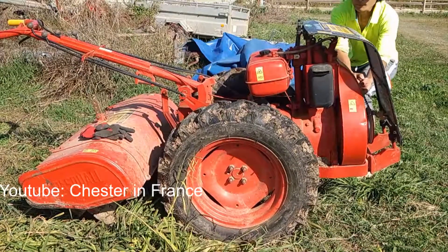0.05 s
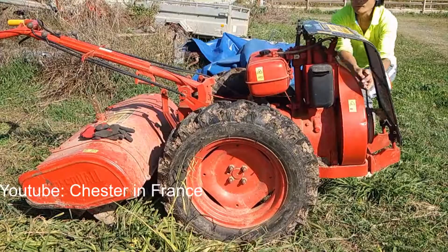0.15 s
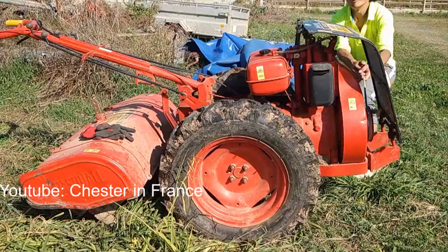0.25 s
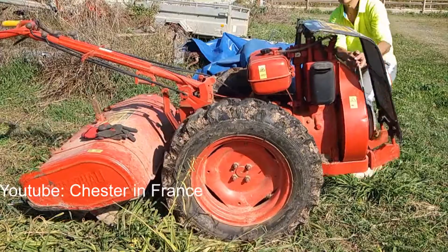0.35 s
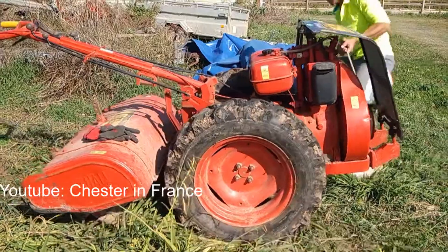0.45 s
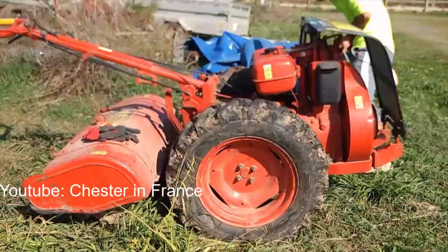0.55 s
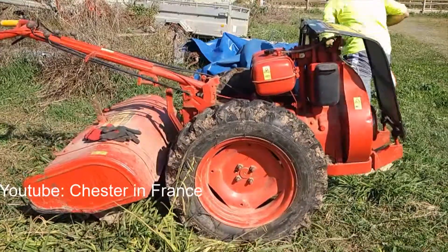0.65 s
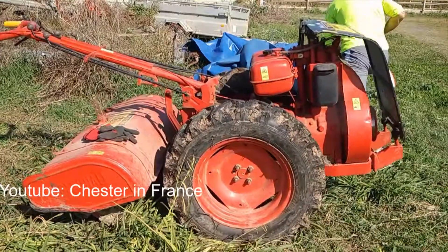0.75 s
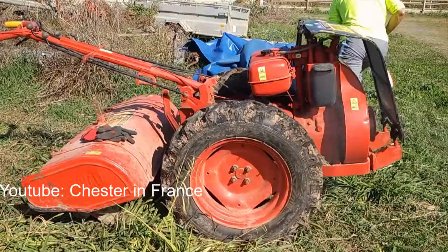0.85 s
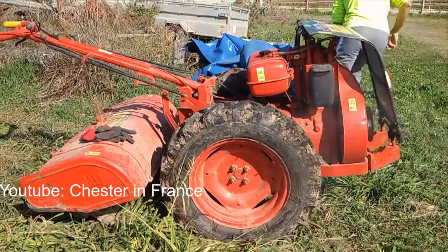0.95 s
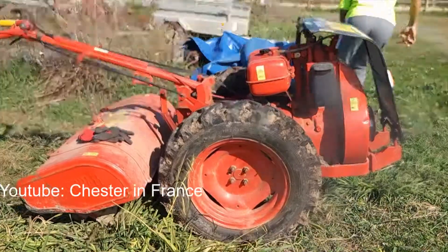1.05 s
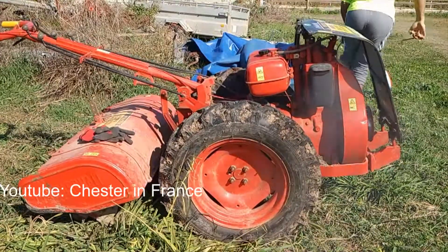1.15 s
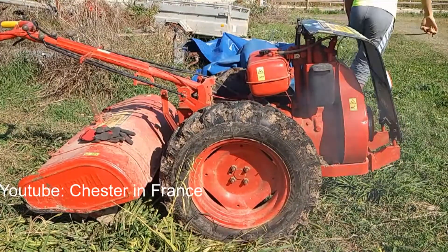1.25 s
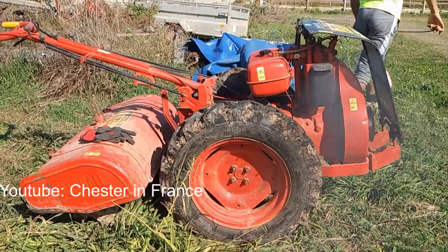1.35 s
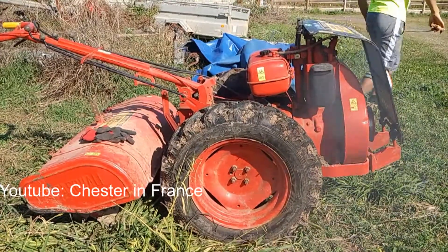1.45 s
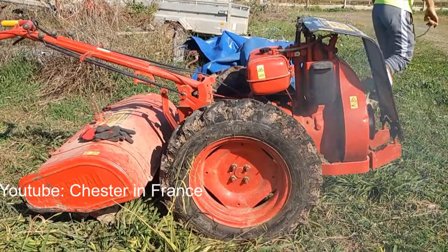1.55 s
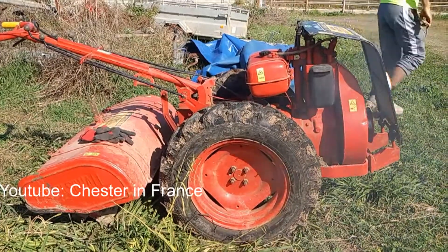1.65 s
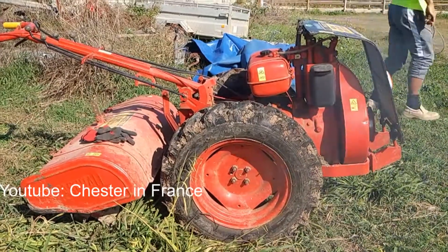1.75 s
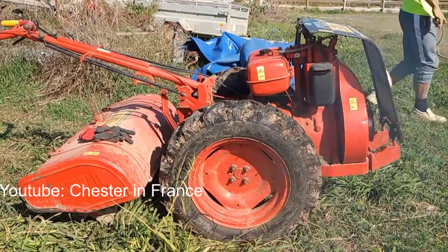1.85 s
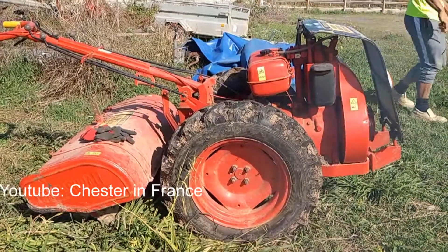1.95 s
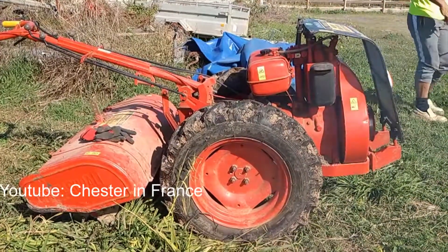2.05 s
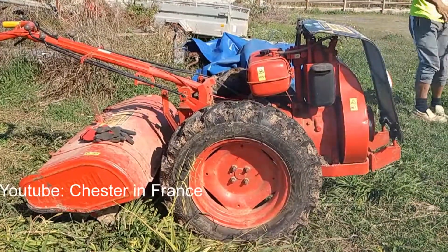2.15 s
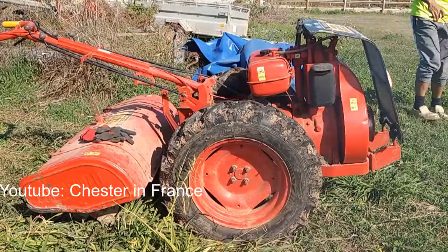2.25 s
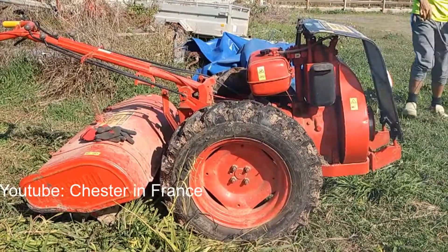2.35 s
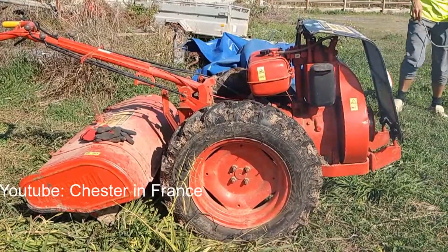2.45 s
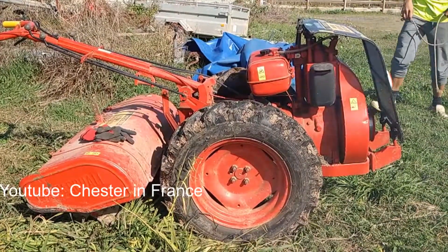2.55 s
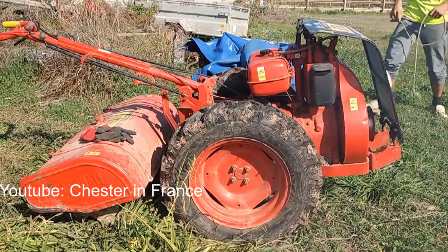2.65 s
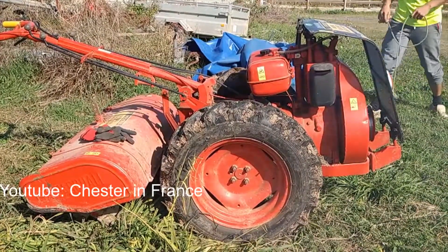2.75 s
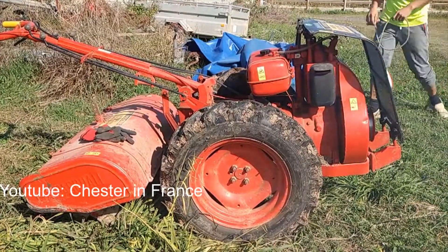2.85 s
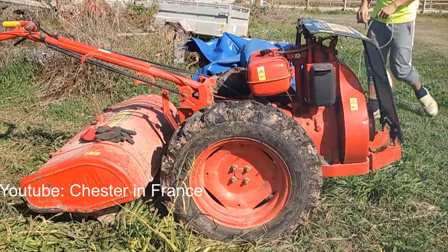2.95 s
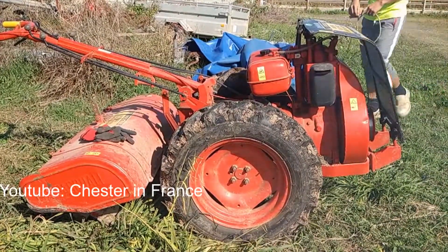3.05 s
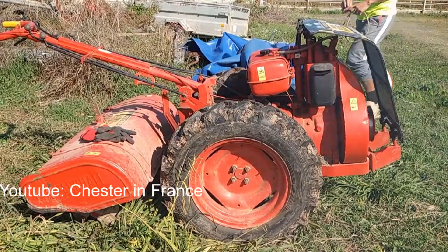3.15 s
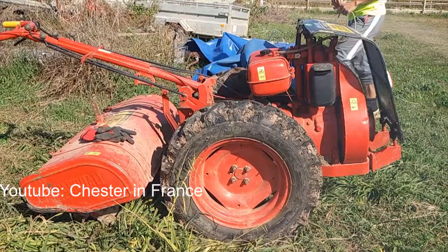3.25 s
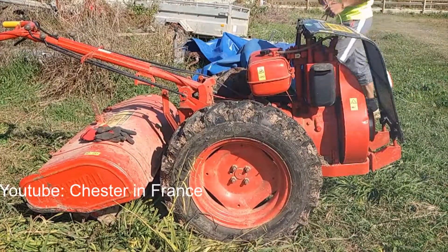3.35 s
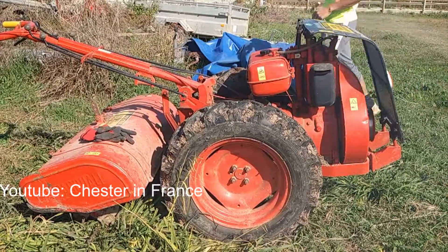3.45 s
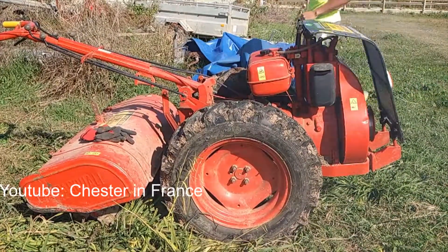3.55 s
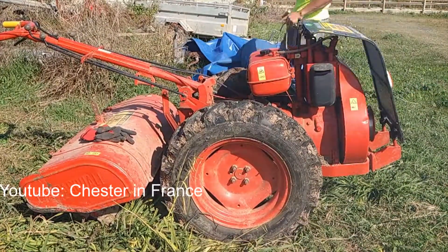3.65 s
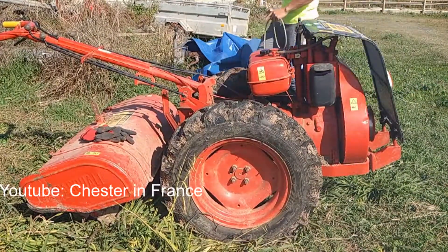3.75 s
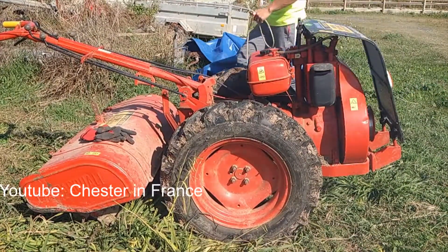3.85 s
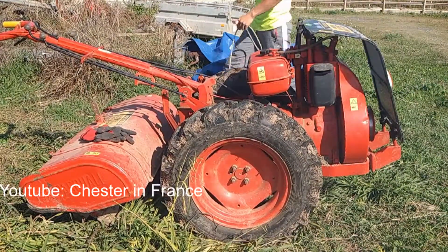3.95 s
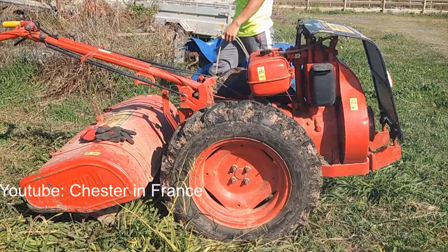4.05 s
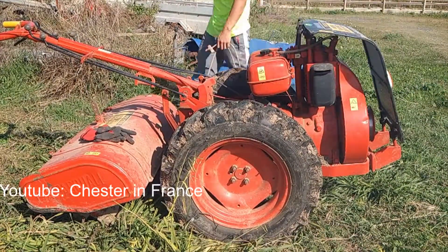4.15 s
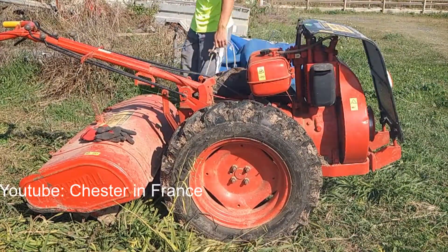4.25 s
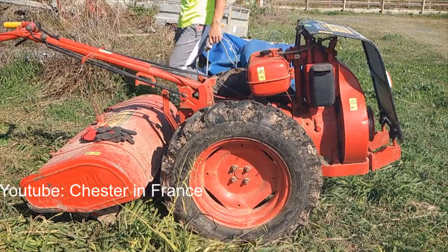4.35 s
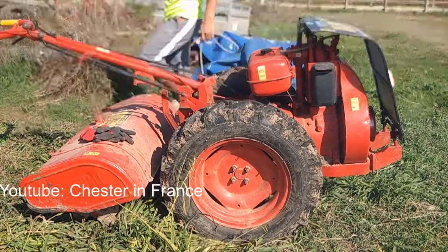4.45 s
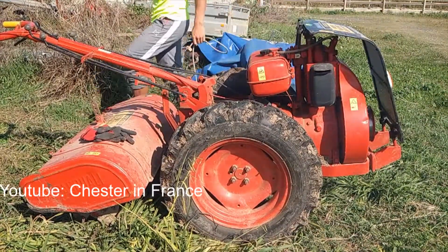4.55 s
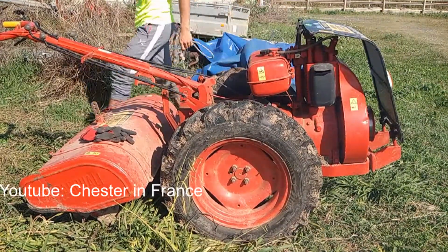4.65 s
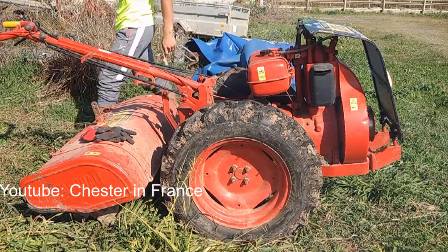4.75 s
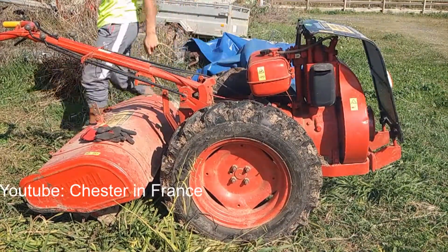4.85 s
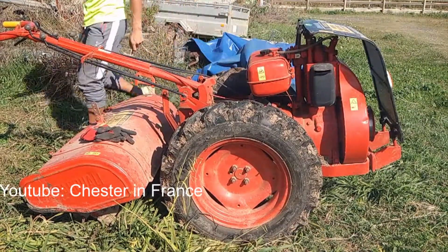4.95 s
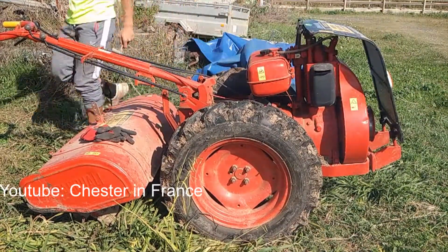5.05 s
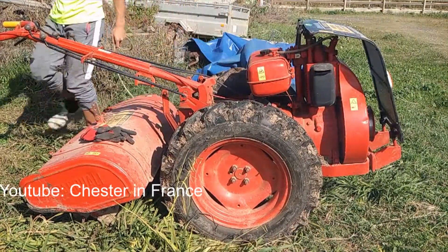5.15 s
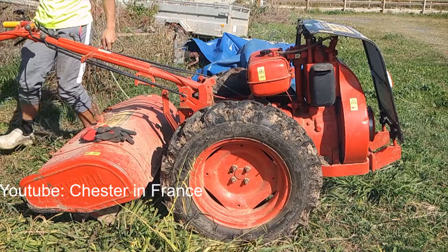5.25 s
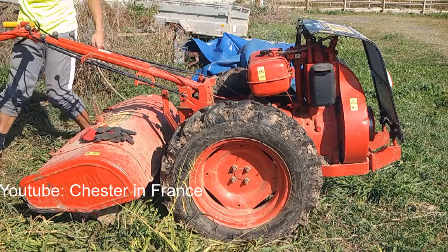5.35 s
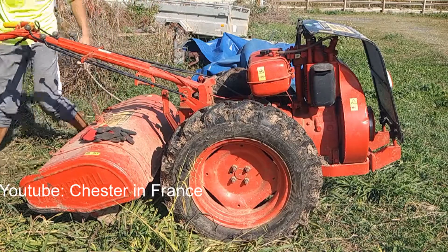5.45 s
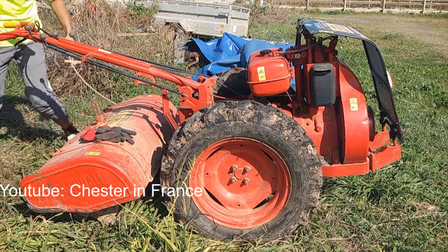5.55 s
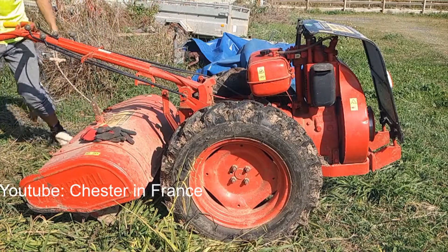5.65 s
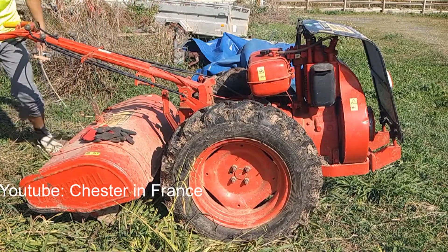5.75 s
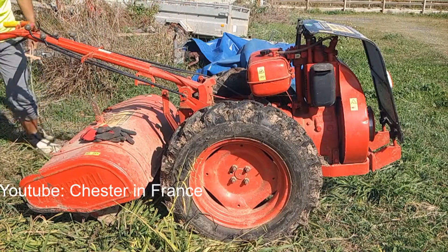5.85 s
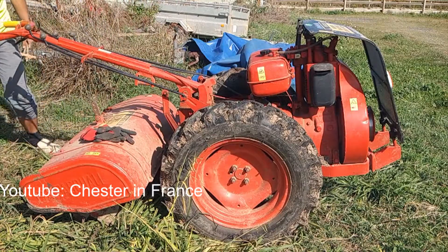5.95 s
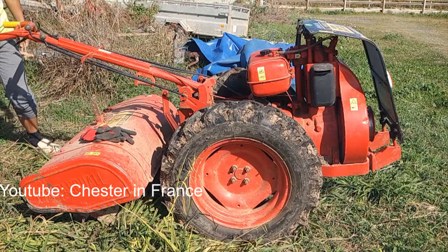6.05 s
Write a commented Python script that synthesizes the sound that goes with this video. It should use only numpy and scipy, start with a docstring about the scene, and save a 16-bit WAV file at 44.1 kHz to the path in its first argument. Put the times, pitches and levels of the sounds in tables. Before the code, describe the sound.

A single-cylinder diesel engine is rope-started with metallic clinks, speeds up with hard knocks, then idles with an even chug outdoors.

```python
"""A single-cylinder tractor diesel is rope-started on open grass, runs up and idles at 13 firings a second.
First the rope rubs and the starting gear clinks. Then, in each cycle, combustion strikes the modes of
the iron block, the exhaust valve releases a thump and a hiss, the piston pushes out a second puff and
the valve gear ticks. A loose part chinks at idle. The knocks of the run-up overload the near microphone."""
import sys
import numpy as np
from scipy import signal
from scipy.fft import rfft, irfft
from scipy.io import wavfile
from scipy.ndimage import uniform_filter1d

SR = 44100
rng = np.random.default_rng(int(sys.argv[2]) if len(sys.argv) > 2 else 0)


def wav_record(signal):
    """Record a signal, one row per channel, as 16-bit PCM in the file named by sys.argv[1]."""
    frames = np.transpose(np.atleast_2d(signal))
    bounded = np.clip(frames, -1, 1)
    # unit amplitude maps onto the largest positive 16-bit level
    quanta = np.round(bounded * 32767).astype(np.int16)
    wavfile.write(sys.argv[1], SR, quanta)


N = 268569
T = np.arange(N) / SR

# noise spectra of field air, gears, metal impacts, exhaust gas and the fast jet under load:
# (frequency [Hz], relative spectral density [dB])
AIR_SPECTRUM = [(30, -12), (85, 3), (370, -16), (500, -32), (900, -19), (1500, -38), (4000, -46),
                (16000, -60)]
GEAR_SPECTRUM = [(30, -56), (200, -6.5), (350, 2.5), (750, -3), (1300, -2.5), (2200, 7), (3000, -6),
                 (4300, -6.5), (7000, -14), (8300, -7), (9500, -17), (12000, -25), (16000, -27)]
SNAP_SPECTRUM = [(100, -7), (400, -2.5), (1200, -13.5), (2200, -1.5), (4000, -7.5), (6000, -1), (8300, 4),
                 (11000, -9), (16000, -19)]
GAS_SPECTRUM = [(40, -28), (90, -25), (210, -3), (400, 4.5), (750, -0.5), (1280, 6.5), (1900, 1.5),
                (3100, -6), (4300, -7.5), (5600, -6.5), (7000, -10), (8200, 1.5), (9500, -10.5),
                (12000, -23), (16000, -28)]
JET_SPECTRUM = [(1000, -55), (5000, -2), (9000, 13), (16000, -2)]
# friction of rope on pulley: (time [s], relative level [dB])
ROPE_PULL = [(.165, -88), (.175, -43), (.25, -47.5), (.34, -48), (.37, -39.5), (.45, -41.5), (.535, -49.5),
             (.548, -27.5), (.6, -61), (.68, -38)]
# gear noise through one cycle: (place in cycle [0-1], relative level [dB])
GEAR_WORK = [(0, -3), (.025, 6), (.09, 2), (.17, -1), (.5, -1), (.76, -3.5), (.81, 2), (.86, -2), (.92, -6),
             (1, -6)]
# impacts of lever, rope and pulley: (time [s], level [dB], t60 [s], power share into the block [0-1])
CLINKS = [(0.1714, -28, 0.015, 0.13), (0.2348, -30, 0.019, 0.1), (0.277, -33, 0.044, 0.96),
          (0.359, -26.5, 0.067, 0.93), (.3937, -49, 0.025, 0.5), (.4266, -41, .04, 0.7),
          (0.478, -37, 0.049, 0.86), (0.545, -19.5, 0.072, 0.73), (.665, -18.5, 0.08, 0),
          (0.6962, -20, 0.15, 0.02), (0.7644, -21.5, 0.038, 0), (.892, -19, 0.085, 0.1),
          (0.9283, -24.5, 0.17, 0.04), (1.089, -17, 0.024, 0)]
# modes of the steel starting pulley: (frequency [Hz], relative level [dB], t60 [s])
PULLEY_MODES = [(3130, -8, 0.15), (5030, -5, 0.13), (6100, 7, 0.12), (6800, 0, 0.13), (7800, 11, 0.23),
                (8960, 12, 0.15)]
# engine speed, running up until the governor holds it: (time [s], firing rate [Hz])
SPEED = [(0.565, 3.918), (0.785, 5.189), (1.559, 10.651), (1.958, 12.408), (2.204, 12.847), (2.487, 13.156),
         (4.078, 13.187), (5.315, 12.796), (6.05, 12.905)]
# engine load: rises over the first firings, stays high through the run-up, falls to zero at idle:
# (time [s], load [0-1])
LOAD = [(.56, 0.03), (.95, 0.79), (1.25, 0.77), (1.8, 0.64), (2.1, 0.57), (2.6, 0), (3.2, 0), (6.05, 0.0)]
# force of combustion, weak at first and hardest in the run-up: (time [s], relative level [dB])
COMBUSTION = [(.565, -19.5), (.78, -9.9), (1.25, -5.5), (1.75, -5), (2.1, -6.5), (2.65, -7), (3.05, -10.5),
              (3.55, -9.5), (5.15, -12.5), (6.05, -10.5)]
# modes of block, fins and covers; outer parts take longer to start ringing:
# (frequency [Hz], relative level [dB], rise [s], t60 [s], gain at full load [dB])
BLOCK_MODES = [(457.1, -5, 0.0096, 0.13, 3), (569.3, -10, 0.0086, 0.14, 3),
               (650.8, -4, 0.00067, 0.25, -13.5), (702.6, -5.5, 0.0013, 0.097, 7.5),
               (862, -4, 0.00031, 0.19, 2.5), (929.5, 5.5, 0.00043, 0.046, 5),
               (961, 4.5, 0.0014, 0.067, -4), (1012, -14, 0.0016, 0.65, 2), (1085, 0, 0.00026, 0.14, -3),
               (1231, 4.5, 0.0028, 0.068, 0.5), (1284.5, 8, 0.0024, 0.098, -2.5),
               (1395, -1.5, 0.00068, 0.061, 15), (1532, -13, 0.00041, 0.54, 3),
               (1560, -12, 0.0012, 0.62, 2), (1658, 0.5, 0.00037, 0.072, 1.5),
               (1746, -14, 0.00069, 0.051, 0), (2032, -6.5, 0.0015, 0.035, 20),
               (2115, 0, 0.0048, 0.078, -6), (2189, 6, 0.0029, 0.08, -3.5),
               (2430, -13.5, 0.0022, 0.061, 15), (2445, -20, 0.0021, 0.079, 24),
               (2644, -4.5, 0.00064, 0.063, 3), (2880, -19, 0.0014, 0.077, 9),
               (3605, -13, 0.0028, 0.058, 4), (4300, -9.5, .001, 0.066, -26)]
# pipe and muffler resonances: (place of peak in cycle [0-1], frequency [Hz], peak level [dB], rise [s],
# t60 [s], gain at full load [dB], gain per halving of speed [dB])
PIPE_MODES = [(.3, 101, -25, 0.0066, 0.045, 7, -1.5), (0.35, 18, -38, 0.014, 0.062, 38, 10),
              (.24, 373, -15, 0.0024, 0.021, 2, -1), (.27, 182, -37.5, 0.0059, 0.025, 7, 6.5),
              (0.47, 112.5, -36, 0.012, 0.063, 0, -11), (.53, 440, -13, 0.0027, 0.015, -1, -9.5),
              (.58, 279.4, -25.5, 0.01, 0.11, -6, -5), (0.29, 143.3, -33, 0.013, 0.13, 3.5, 1.5),
              (.13, 176, -43, 0.017, 0.12, 7, 8.5)]
# exhaust flow noise through one cycle: (place in cycle [0-1], relative level [dB])
GAS_FLOW = [(0, -13.5), (.2, -17), (.225, -25), (.25, 7), (.29, 3.5), (.36, -2), (.52, 1.5), (.6, -2),
            (.7, -16.5), (1, -9)]
# taps on a loose metal part: (time [s], level [dB])
CHINKS = [(2.466, -26), (2.996, -25), (3.529, -28), (3.604, -22)]
# modes of that part: (frequency [Hz], relative level [dB], t60 [s])
LOOSE_PART_MODES = [(4800, -1, .06), (5020, 0, .07), (7650, -5, .07), (8200, -3, .08)]


def amp(db):
    """Decibels to amplitude ratio."""
    return 10 ** (np.asarray(db) / 20)


def unit(x):
    """Normalisation to rms 1."""
    return x / np.sqrt(np.mean(x ** 2) + 1e-20)


def follow(rows, at):
    """Linear interpolation in a two-column table."""
    return np.interp(at, *np.transpose(rows))


def add(mix, s, sound):
    """Superposition: a sound joins the mix at time s."""
    part = mix[max(round(s * SR), 0):][:len(sound)]
    part += sound[:len(part)]


def noise(spectrum):
    """Spectral shaping of white noise, at rms 1."""
    hz, db = np.transpose(spectrum)
    gain = amp(np.interp(np.log(np.fft.rfftfreq(N, 1 / SR) + 1), np.log(hz), db))
    return unit(irfft(rfft(rng.standard_normal(N)) * gain, N))


def free_ring(modes, t):
    """Free vibration is a sum of exponentially damped sines."""
    return sum(amp(db - 60 * t / t60) * np.sin(2 * np.pi * hz * t) for hz, db, t60 in modes)


def panels(x, t60, share, split_hz=2600):
    """High modal density: thin steel panels give a share of the treble a short, noise-like ring."""
    t = T[:SR // 8]
    ring = rng.standard_normal(len(t)) * amp(-60 * t / t60)
    high = signal.sosfiltfilt(signal.butter(2, split_hz, "high", fs=SR, output="sos"), x)
    rung = signal.fftconvolve(high, ring / np.linalg.norm(ring))[:N]
    return x - high + np.sqrt(1 - share) * high + np.sqrt(share) * rung


def block_modes():
    """Normal modes of the block: one swelling and decaying sine per row."""
    hz, db, rise, t60, _ = np.transpose(BLOCK_MODES)[:, :, None]
    t = T[:SR // 4]
    return amp(db - 60 * t / t60) * np.sin(2 * np.pi * hz * t) * (1 - np.exp(-t / rise))


def through_block(x, modes, share, joint_t60=.09):
    """Structure-borne sound: a share of the power crosses damped joints and takes on the block's colour."""
    damping = amp(-60 * T[:modes.shape[1]] / joint_t60)
    rung = signal.fftconvolve(x, modes.sum(0) * damping)[:N]
    return np.sqrt(1 - share) * x + np.sqrt(share) * rung * np.std(x) / np.std(rung)


def crank():
    """Phase is the integral of rate: gives cycle start times and the cycle count at every sample."""
    t = np.arange(N + SR // 4) / SR  # runs on so that the last cycle is whole
    first_firing = SPEED[0][0]
    cycles = np.cumsum(follow(SPEED, t) * (t >= first_firing)) / SR
    starts = np.append(first_firing, np.interp(np.arange(1, int(cycles[N - 1]) + 2), cycles, t))
    return starts, np.interp(T, starts, np.arange(len(starts)))


def cyclic_noise(spectrum, alike=.45):
    """Partial periodicity: some noise repeats, as the same parts meet at the same crank angles."""
    starts, cycles = crank()
    since_start = np.arange(N) - np.round(starts[cycles.astype(int)] * SR).astype(int)
    return np.sqrt(alike) * noise(spectrum)[since_start] + np.sqrt(1 - alike) * noise(spectrum)


def field_air(level_db=-61):
    """Ambient noise: the faint, steady, low sound of an open field."""
    return amp(level_db) * noise(AIR_SPECTRUM)


def rope_and_gears(modes, idle_db=-21, idle_hz=13, db_per_doubling=7.5, rope_db=4, grain_db=2.5):
    """Friction and impact: the rope rubs, then gears and tappets chatter, most at firing and inlet closure."""
    starts, cycles = crank()
    grain = unit(uniform_filter1d(rng.standard_normal(N), size=60))
    running_db = idle_db + db_per_doubling * np.log2(follow(SPEED, T) / idle_hz)
    contact_db = np.where(T < ROPE_PULL[-1][0], rope_db + follow(ROPE_PULL, T), running_db)
    db = contact_db + follow(GEAR_WORK, cycles % 1) + grain_db * grain
    chatter = panels(cyclic_noise(GEAR_SPECTRUM) * amp(db), t60=0.02, share=0.91)
    dull = signal.sosfilt(signal.butter(1, 2200, fs=SR, output="sos"), chatter)
    treble = np.where(T < starts[0], 0.72, 1)  # duller while only the rope turns the crank
    return through_block(dull + treble * (chatter - dull), modes, share=.3)


def clinks(modes, pulley_db=-11):
    """Impact excitation: metal knocks ring panels, pulley and block as the rope is drawn and flies off."""
    direct, into_block, t = np.zeros(N), np.zeros(N), T[:SR // 4]
    for s, db, t60, share in CLINKS:
        fade = amp(db - 60 * t / t60)
        add(direct, s, np.sqrt(1 - share) * fade)
        add(into_block, s, np.sqrt(share) * fade)
    pulley = free_ring(PULLEY_MODES, t)
    snaps = direct * noise(SNAP_SPECTRUM)
    spinning = T > .5  # the pulley rings once it is pulled round
    pulley_ring = amp(pulley_db) * signal.fftconvolve(snaps * spinning, pulley / np.linalg.norm(pulley))
    clatter = panels(snaps, t60=0.052, share=0.24)
    block_ring = through_block(into_block * noise(SNAP_SPECTRUM), modes, share=1.0)
    return clatter + pulley_ring[:N] + block_ring


def firings(scatter_s=.0003, scatter_db=.6):
    """Cycle-to-cycle variation of combustion: rows of (time [s], level [dB], period [s])."""
    starts = crank()[0]
    late, harder = rng.standard_normal((len(starts) - 1, 2)).T
    db = follow(COMBUSTION, starts[:-1]) + scatter_db * harder
    return np.transpose([starts[:-1] + scatter_s * late, db, np.diff(starts)])


def knocks(modes, fired, gain_db=-8, scatter_db=1.2, slap_place=0.15, slap_db=-13):
    """Impulse response: combustion strikes the block; a moment later the piston slaps its liner."""
    out, load_db = np.zeros(N), np.array(BLOCK_MODES)[:, -1]
    for s, db, period in fired:
        mode_db = db + gain_db + load_db * follow(LOAD, s)
        blow, slap = amp(mode_db + scatter_db * rng.standard_normal((2, len(modes)))) @ modes
        add(out, s, blow)
        add(out, s + slap_place * period, amp(slap_db) * slap)
    return out


def cover_crack(fired, gain_db=-12, t60=0.031, db_per_knock_db=0.6):
    """Broadband excitation: the sharp pressure rise of each firing rattles the covers."""
    out, t = np.zeros(N), T[:SR // 10]
    ring = noise(GEAR_SPECTRUM)[:len(t)] * amp(gain_db - 60 * t / t60)
    for s, db, _ in fired:
        add(out, s, amp(db_per_knock_db * db) * ring)
    return out


def exhaust_puffs(scatter_db=0.4):
    """Cavity resonance: blowdown and the piston's push each set the gas in pipe and muffler swinging."""
    out, starts = np.zeros(N), crank()[0]
    periods = np.diff(starts)
    t = T[:SR // 4] - T[SR // 16]  # time from the peak of a puff
    for s, period in zip(starts, periods):
        load, halvings = follow(LOAD, s), np.log2(period / periods.min())
        for place, hz, db, rise, t60, load_db, slow_db in PIPE_MODES:
            swell = np.exp(-(np.minimum(t, 0) / rise) ** 2)
            fade = amp(-60 * (np.hypot(np.maximum(t, 0), rise) - rise) / t60)
            gain = amp(db + load_db * load + slow_db * halvings + scatter_db * rng.standard_normal())
            add(out, s + place * period + t[0], gain * np.cos(2 * np.pi * hz * t) * swell * fade)
    return out


def exhaust_hiss(modes, idle_db=-17.5, load_db=3, scatter_db=.6, slow_db=-9, flutter_db=2, jet_db=-10):
    """Flow noise: gas hisses out while the valve is open; at low speed it is spent early in the stroke."""
    starts, cycles = crank()
    place, number = cycles % 1, cycles.astype(int)
    periods = np.diff(starts)
    spent = np.log2(periods / periods.min())[number] * np.clip((place - .28) / 0.25, 0, 1)
    flutter = unit(uniform_filter1d(rng.standard_normal(N), size=120))
    stroke_db = idle_db + load_db * follow(LOAD, starts) + scatter_db * rng.standard_normal(len(starts))
    db = stroke_db[number] + follow(GAS_FLOW, place) + slow_db * spent + flutter_db * flutter
    jet = amp(jet_db) * follow(LOAD, T) * noise(JET_SPECTRUM)  # under load the faster jet is brighter
    gas = (cyclic_noise(GAS_SPECTRUM) + jet) * amp(db) * (T > starts[0])
    return through_block(panels(gas, t60=0.032, share=0.46), modes, share=0.16)


def chinks():
    """Free vibration: the shaking engine taps a loose metal part, which rings briefly."""
    out, ring = np.zeros(N), free_ring(LOOSE_PART_MODES, T[:SR // 8])
    for s, db in CHINKS:
        add(out, s, amp(db) * ring)
    return out


def scene():
    """Superposition of the engine's sources and the field air, in one channel."""
    modes, fired = block_modes(), firings()
    combustion = knocks(modes, fired) + cover_crack(fired)
    exhaust = exhaust_puffs() + exhaust_hiss(modes)
    mechanism = rope_and_gears(modes) + clinks(modes) + chinks()
    return (combustion + exhaust + mechanism + field_air())[None]


def record(dry, ceiling=0.9, low_cut_hz=56, high_cut_hz=16250):
    """Band limiting and saturation: the microphone sheds deep bass, rounds peaks and loses the top treble."""
    low_cut = signal.butter(3, low_cut_hz, "high", fs=SR, output="sos")
    thin = signal.sosfiltfilt(low_cut, dry, padtype="even", padlen=SR // 8)
    saturated = thin / (1 + (thin / ceiling) ** 4) ** (1 / 4)
    high_cut = signal.firwin(511, high_cut_hz, window=("kaiser", 9), fs=SR)
    return signal.oaconvolve(saturated, high_cut[None], "same")


dry = scene()
out = record(dry)
wav_record(out)
```